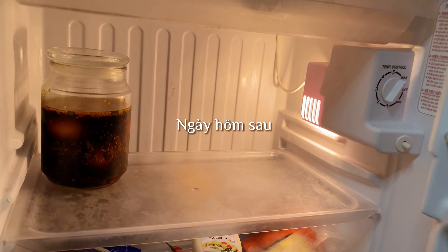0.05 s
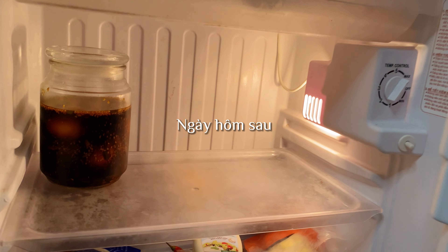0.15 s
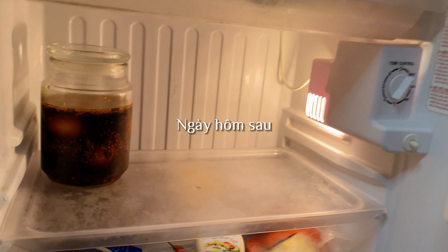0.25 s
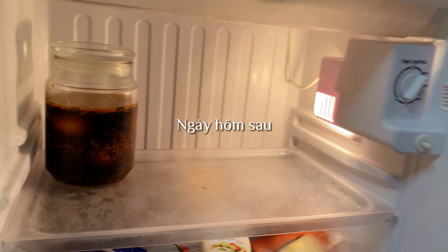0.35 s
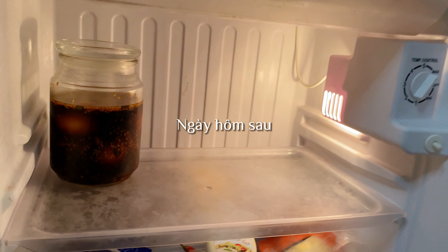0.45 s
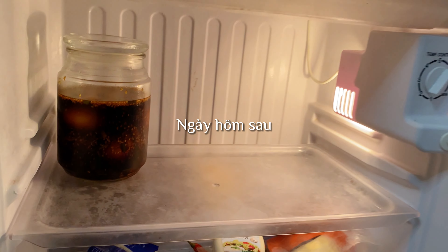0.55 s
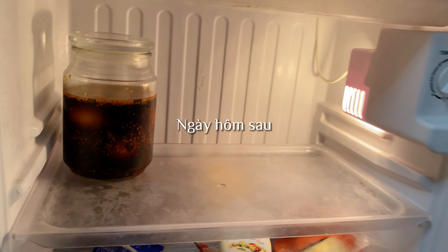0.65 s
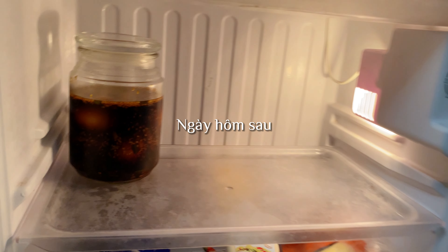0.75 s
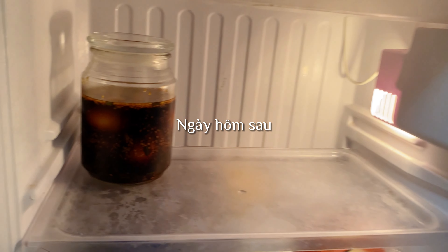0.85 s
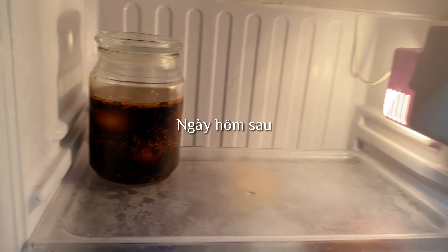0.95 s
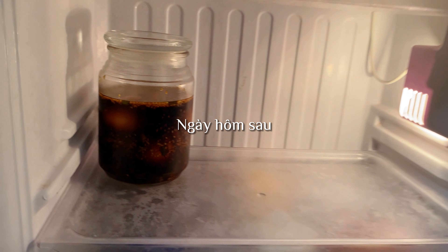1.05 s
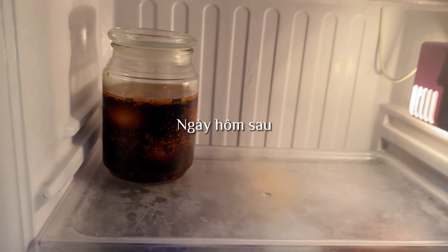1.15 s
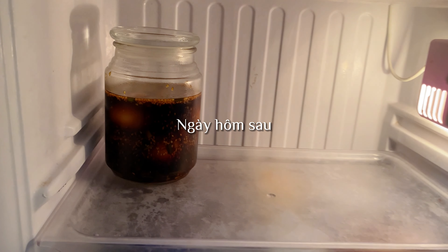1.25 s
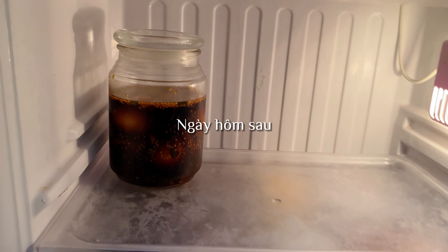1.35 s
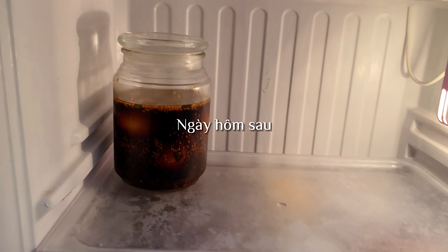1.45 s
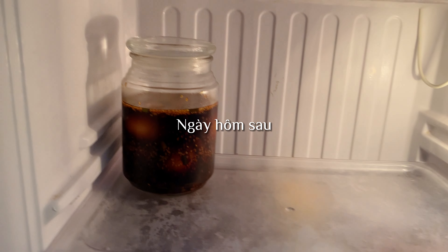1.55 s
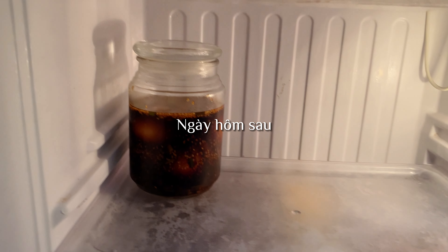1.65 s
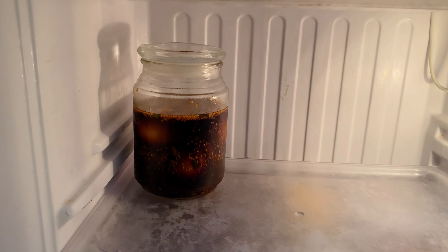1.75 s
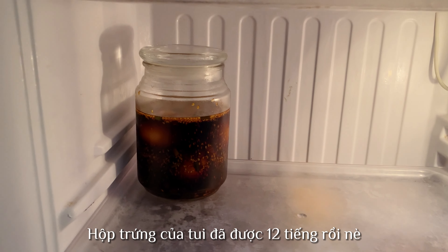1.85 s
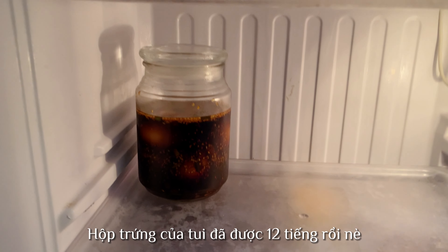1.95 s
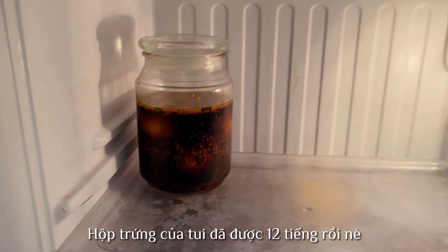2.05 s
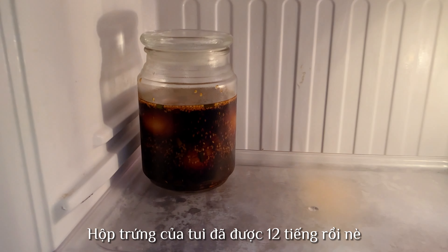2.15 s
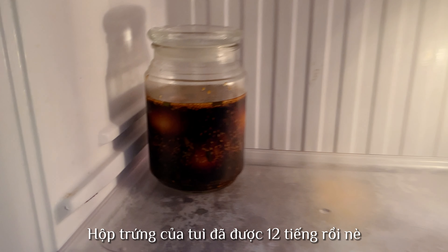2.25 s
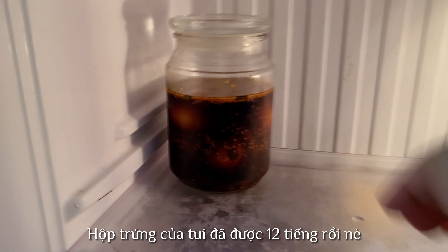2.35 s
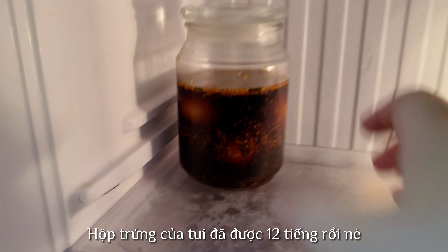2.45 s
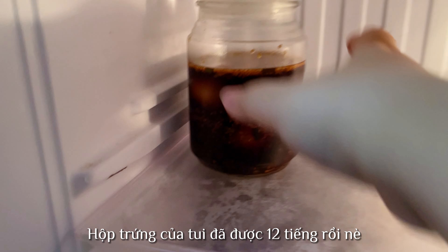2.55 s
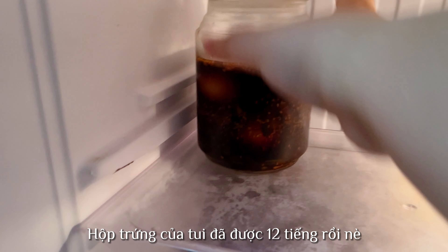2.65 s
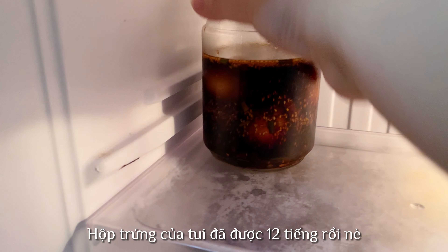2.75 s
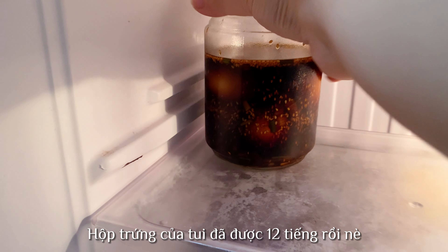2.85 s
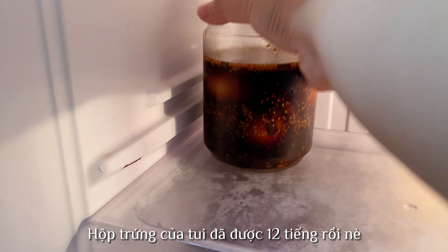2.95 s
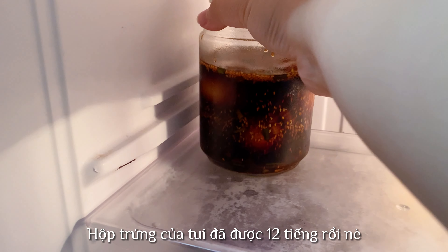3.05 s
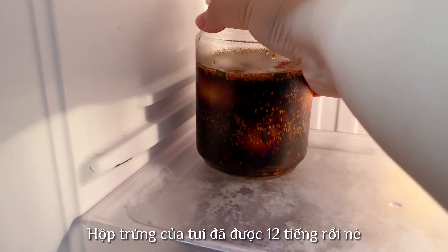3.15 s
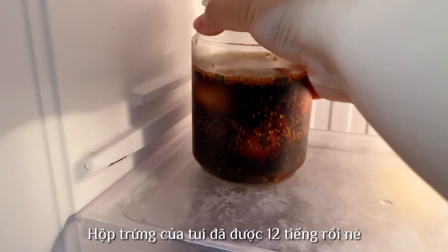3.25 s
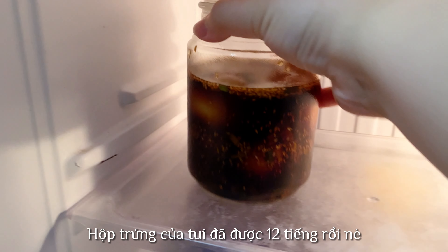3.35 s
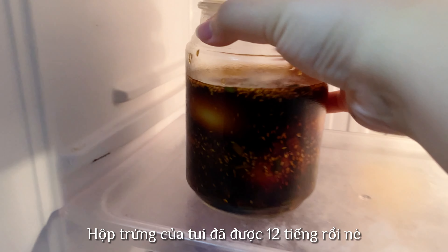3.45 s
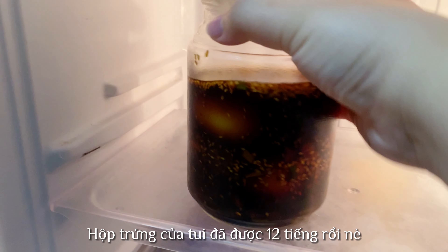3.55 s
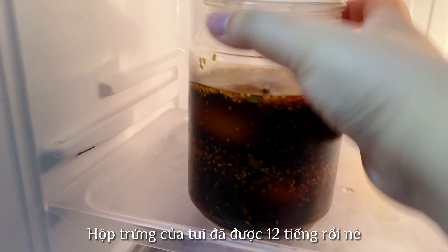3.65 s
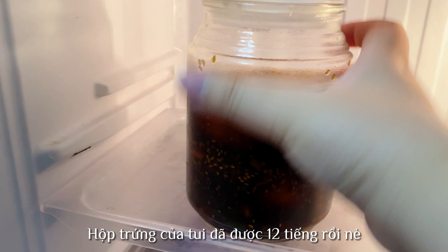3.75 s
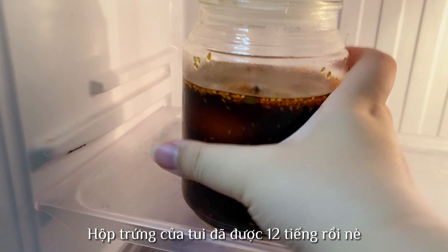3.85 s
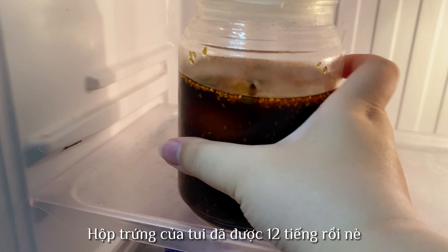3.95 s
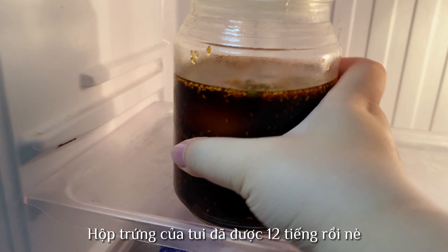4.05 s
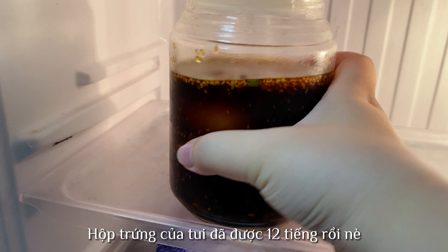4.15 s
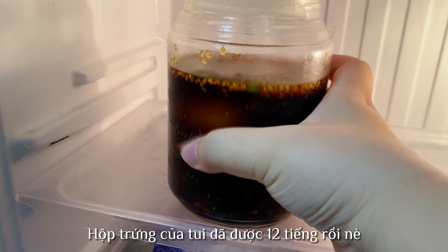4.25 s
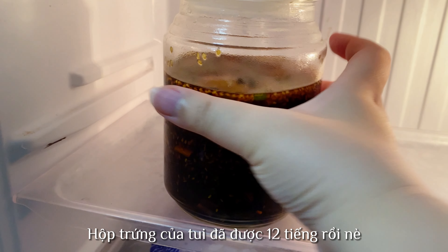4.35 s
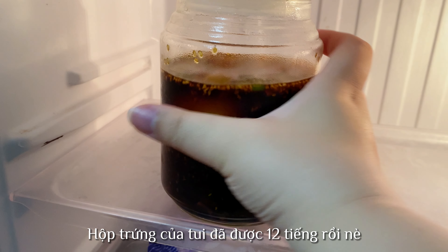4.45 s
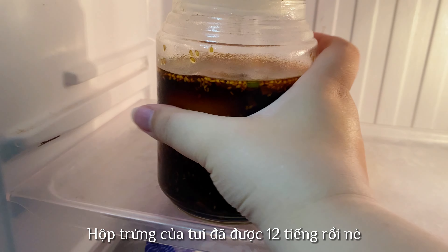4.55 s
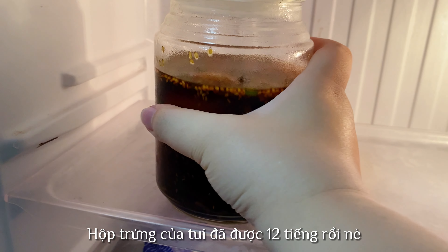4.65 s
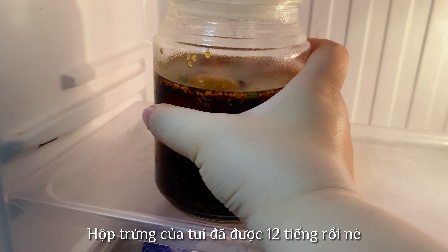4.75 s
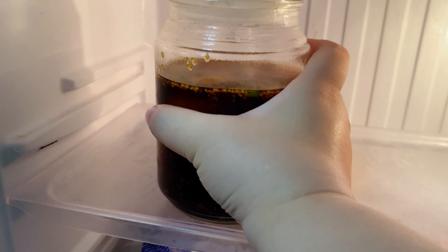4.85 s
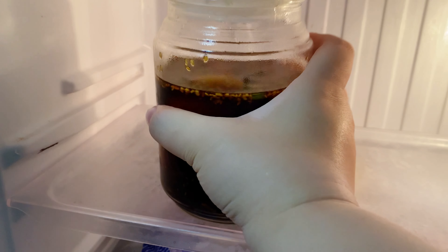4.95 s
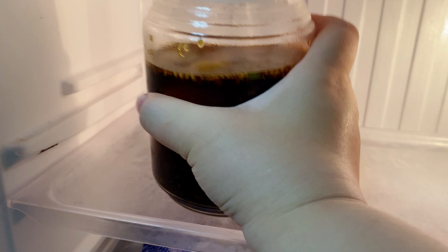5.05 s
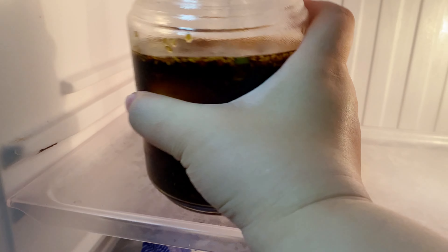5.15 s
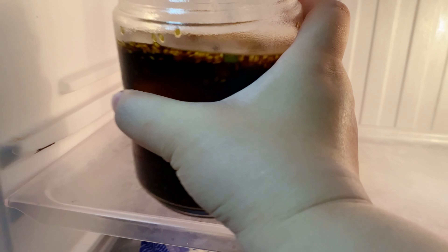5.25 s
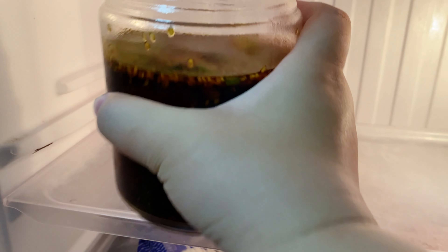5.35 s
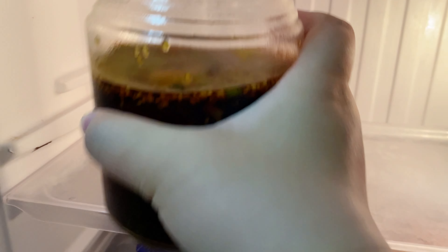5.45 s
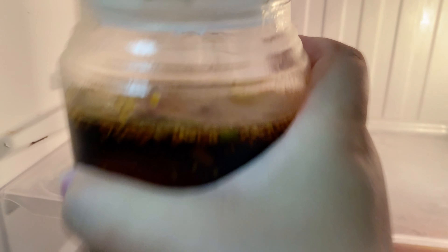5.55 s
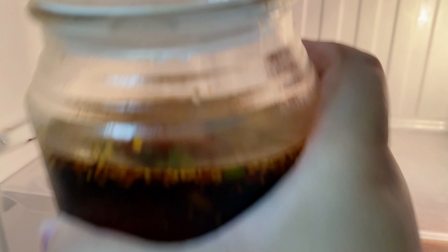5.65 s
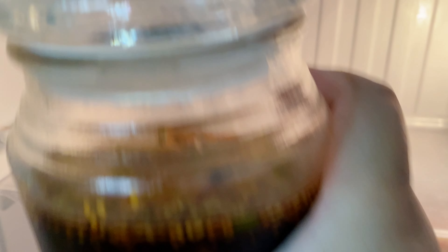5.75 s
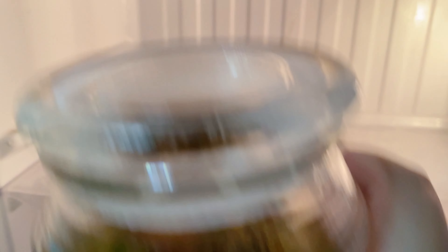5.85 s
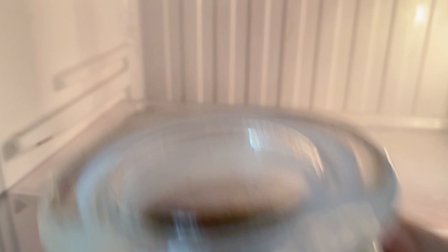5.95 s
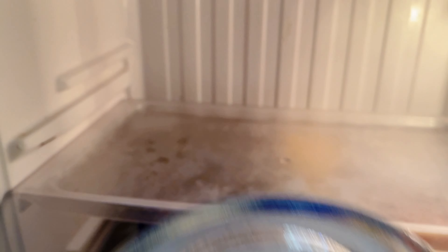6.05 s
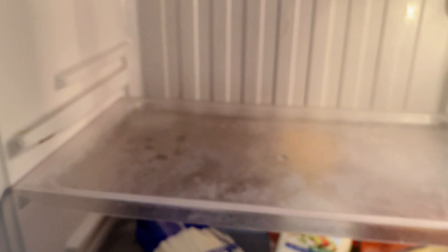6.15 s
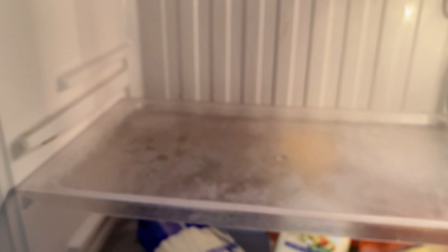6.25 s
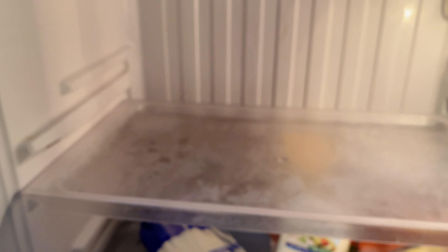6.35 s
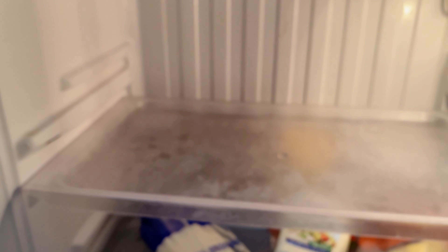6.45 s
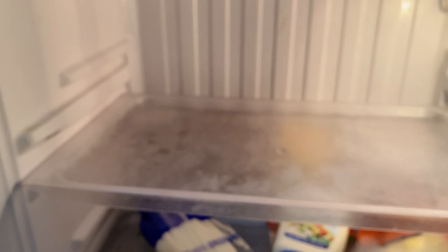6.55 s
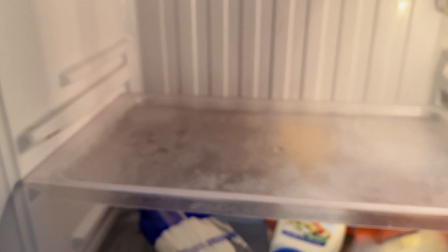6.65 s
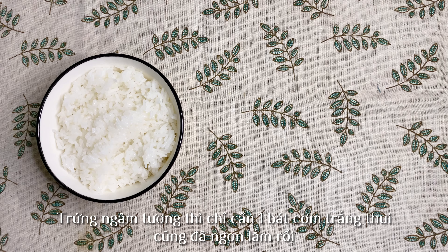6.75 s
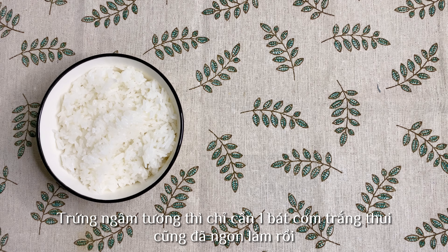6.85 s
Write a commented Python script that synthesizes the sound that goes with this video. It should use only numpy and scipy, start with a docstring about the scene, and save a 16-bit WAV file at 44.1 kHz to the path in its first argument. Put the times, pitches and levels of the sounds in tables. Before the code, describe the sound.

An open refrigerator hums while a heavy glass jar is dragged along its shelf in starts, with two clinking, hollow knocks.

```python
"""A full glass jar is dragged in starts over a gritty refrigerator shelf, heard from a phone peering in.
Grit rasps under the rim and shakes the shelf. The jar bumps twice: the glass pings and the shelf booms.
Behind it the compressor hums, cold air and the kitchen murmur in the cabinet, a sleeve brushes by
and fingers shift on the phone. Near the end the sound drops out and returns in a quieter place."""
import sys
import numpy as np
from scipy import signal
from scipy.fft import rfft, irfft, next_fast_len
from scipy.io import wavfile
from scipy.ndimage import uniform_filter1d, map_coordinates

SR = 44100
rng = np.random.default_rng(int(sys.argv[2]) if len(sys.argv) > 2 else 0)


def transcribe(signal):
    """Save signal, clipped to [-1, 1], as a 16-bit WAV file at the path in sys.argv[1]."""
    frames = np.atleast_2d(signal).T
    limited = np.clip(frames, -1, 1)
    pcm = np.round(limited * 32767).astype(np.int16)
    wavfile.write(sys.argv[1], SR, pcm)


N = 303849
T = np.arange(N) / SR
FFT_SIZE = next_fast_len(N)
FREQS = np.fft.rfftfreq(FFT_SIZE, 1 / SR)

# how enclosed the background sounds: t/s, enclosure (0 open, 1 deep in the cabinet)
# at 6.72 s it cuts to a quieter place
ENCLOSURE = [(0, 0.063), (1.5, 0.35), (2.3, 0.42), (2.8, 0.53), (5.0, 0.97), (6.7, 0.96), (6.74, 0.089),
             (6.89, 0.13)]
# tone colour of the murmuring air: f/Hz, relative level/dB
AIR_COLOUR = [(18, -32.5), (30, -11.5), (53, -4), (71, -6), (102, -2.5), (156, -14), (177, -15.5),
              (307, -17), (432, -25.5), (546, -31.5), (622, -33), (945, -34), (2690, -43), (8950, -58),
              (15500, -85)]
# how alike the air sounds left and right: f/Hz, likeness (0 to 1)
AIR_LIKENESS = [(40, 0.166), (130, 0.2), (300, 1), (700, 0.11), (2000, 0.035), (15000, 0.75)]
# pitches the cabinet's air favours: f/Hz, width/Hz, boost/dB
AIR_RESONANCES = [(141, 15, 3), (230, 30, 2), (271, 4.7, -6.5), (329.7, 9.5, 7.5), (351.3, 7.5, 5.5),
                  (397, 24, 5), (484, 14, 7), (1052, 180, 5), (3170, 300, 4)]
# hum at 1, 2 and 3 times the shaft rate: open level/dB, gain when enclosed/dB, flutter/dB, left lag/rad
HUM_TONES = [(-48, 4.5, 1.4, 1.4), (-59.5, 7.5, 4, 0.82), (-63, 5.5, 4.5, .2)]
# thin compressor tones: f/Hz, level/dB, share of the changing whine boost, flutter/dB
WHINE_TONES = [(539, -67.5, 0.98, 0.6), (935, -79, 0.13, 2.5), (1437, -78.5, 0.2, 4.5),
               (5103, -91, .8, 3.5)]
# fingers shifting on the phone: t/s, level/dB, f/Hz, left minus right/dB
FINGER_BUMPS = [(0.194, -40.5, 433, 2), (0.404, -33, 221, 1), (0.617, -33, 340, 2), (1.092, -33.5, 400, -5),
                (1.364, -33.5, 387, 8), (1.47, -44, 300, -2), (6.623, -40, 480, 2.5)]
# level difference between the two microphones: f/Hz, left minus right/dB
MIC_BALANCE = [(60, 0.5), (110, -8.5), (200, -2), (380, -3.5), (700, -15), (1290, -2.5), (2380, -4),
               (4400, -11.5), (8120, -3), (15000, 1)]
# phase difference between them: f/Hz, left lead/rad
MIC_PHASE = [(60, -.3), (140, -.6), (330, -.75), (520, -1.4), (950, -5.7), (1290, -5.4), (1890, -4.4),
             (3190, -7.6), (4130, -7.1), (5170, -7.3), (5770, -8.7), (7670, -8.5), (11700, -6.3)]
# echo of the cabinet: f/Hz, time to fade by 60 dB/s
ECHO_FADE = [(200, 0.5), (1000, 0.26), (4000, 0.11), (12000, 0.046)]
# ringing tones (modes) of the shelf and liner: f/Hz, level/dB, time to fade by 60 dB/s
SHELF_MODES = [(139.14, 0.5, 1.43), (174.4, -1.5, 0.51), (225.4, -6.5, 0.27), (262.7, -7.5, 0.33),
               (306.3, -3.5, 0.2), (334.6, -5.5, 0.11), (399, -10, 0.16), (439, -7, 0.12),
               (474, -6.5, 0.17), (547.8, -10, 0.34), (672.6, -6, 0.12), (760, -12, 0.2), (868.6, -6, 0.12),
               (1140, -10.5, 0.16), (1180, -7, 0.067)]
# weight landing on the shelf: t/s, strength/dB, contact time/ms, favoured f/Hz
SHELF_THUDS = [(2.84, -45.5, 0.93, 527), (3.027, -40.5, 0.52, 500), (3.14, -32, 0.26, 487),
               (3.31, -36.5, 1.1, 329), (3.4, -32, 3.1, 320), (3.43, -36, 5, 145), (3.495, -30, 2.2, 328),
               (3.447, -32, 0.39, 683), (3.533, -25, 0.83, 800), (3.535, -23.5, 1.4, 327.4),
               (3.55, -14.5, 5.33, 159.4), (3.734, -35.5, 2.5, 152), (5.558, -26, 0.8, 468),
               (5.565, -26, 0.23, 775), (5.573, -15, 0.97, 294), (5.59, -18, 1.34, 402),
               (5.62, -27, 6.6, 132), (5.638, -19, 1.5, 269), (5.662, -21, 1.16, 229)]
# ringing tones of the jar wall: f/Hz, level/dB, time to fade by 60 dB/s
GLASS_MODES = [(1015, 0, 0.033), (1240, 2, 0.049), (2110, 4, 0.037), (2545, -1.5, .04), (2735, -3, .045),
               (3005, 0, 0.022), (4610, -2.5, .03), (5800, 0, .04)]
# taps on the glass: t/s, strength/dB, favoured f/Hz
GLASS_TAPS = [(0.3507, -40, 3050), (.651, -59, 2000), (3.53, -22, 3044), (3.536, -26, 1025),
              (3.964, -49, 1015), (4.163, -49, 2370), (5.557, -25, 1280), (5.558, -22.5, 2700),
              (5.583, -27.5, 2440), (5.608, -31, 2730), (5.625, -34, 2710)]
# tone colour of the grit: f/Hz, relative level/dB
GRIT_COLOUR = [(120, -47.5), (200, -19.5), (334, 5.5), (577, -2.5), (693, -3.5), (1310, 2), (3100, -9),
               (6220, -9.5), (11000, -16), (15800, -23.5)]
# pitches the jar favours: f/Hz, width/Hz, boost/dB
JAR_RESONANCES = [(325.7, 30, 8), (491, 69, 4), (681.5, 25, 12.5), (868, 66, 9), (1162, 270, -1),
                  (3025, 300, 4.5), (3540, 160, 5.5), (5773, 280, 9), (11600, 1700, 3)]
# short cracks: t/s, strength at 1.9-7 kHz/dB, then added to it: body/dB, fizz/dB, topmost fizz/dB
CRACKS = [(0.3492, -45, 4.5, -7, 4), (0.403, -60, 7, 7, -10), (0.648, -54, -3, 1, -15),
          (0.655, -55.5, 5, 2, -15), (0.9376, -59, 8, 10.5, 1), (1.088, -54.5, 21, -41, -37),
          (1.094, -61, 18, -34, -37), (1.294, -46.5, -1.5, -14, -24), (1.308, -45.5, 1, -4, -21),
          (1.709, -52, -19, -8, -27), (1.734, -51.5, 3, -2, -10), (2.214, -45.5, -0.5, -3, -23),
          (2.246, -67, -11, 3, 4), (2.839, -62, 6, -16, -20), (3.1017, -46.5, 7, -5, -15),
          (3.274, -35.5, 7, -17, -17), (3.3975, -28, -3, -18.5, -4), (3.4042, -36.5, -1, -28.5, 17.5),
          (3.53, -24.5, 7, 10.5, 5), (3.8255, -46, 5.5, -33, -49), (3.9332, -50.5, 1, -7, -24.5),
          (3.9629, -48, 13.5, -23, -8), (4.154, -34.5, -4.5, 0.5, 0), (4.5303, -59.5, 0, 3, -1),
          (4.569, -51, -9, -3, -13), (4.5993, -56.5, -8, 9, 13), (4.793, -53, -4.5, 1, 2),
          (5.339, -62.5, 9, -3.5, -8.5), (5.5561, -21.5, 2.5, -15, -19), (5.566, -22, 1.5, -11.5, -30),
          (5.582, -34.5, -1, -6, -10), (5.603, -32.5, 8, -6, -25), (5.622, -37, 12, -20, -25)]
# hand and sleeve brushing: start/s, peak/s, end/s, grit level/dB, then added to it: rasp/dB, fizz/dB
SLEEVE_STROKES = [(1.3, 1.38, 1.59, -68.5, -22, -1), (1.64, 1.734, 1.86, -72, -12, -7),
                  (2.21, 2.24, 2.5, -76.5, -2, -9), (6.04, 6.272, 6.5, -75.5, -14.5, 1)]
# short slips of the jar: start/s, peak/s, end/s, grit level/dB, then added to it: rasp/dB, fizz/dB
JAR_SLIPS = [(2.8, 2.86, 3.1, -90, 23.5, -1), (2.9, 2.932, 2.97, -82.5, 16, 10),
             (3.984, 3.996, 4.28, -59, -7, 1), (3.99, 4.045, 4.07, -56, -7, -1.5),
             (4.07, 4.155, 4.17, -54.5, 3, -2), (4.15, 4.228, 4.24, -56, -1.5, 3.5),
             (4.2, 4.3, 4.47, -77, -3, 5), (4.42, 4.485, 4.53, -81, -3, 7), (4.51, 4.58, 4.74, -68, -1, 3),
             (4.59, 4.65, 4.76, -74, 2, -0.5), (4.77, 4.805, 4.88, -67.5, 5.5, 0.5),
             (5.553, 5.59, 5.687, -43, 7.5, -14.5)]
# the long drag, broken by the first bump: t/s, grit level/dB
LONG_DRAG = [(3.0, -86), (3.014, -62), (3.06, -58), (3.13, -53.5), (3.155, -51), (3.225, -52.5),
             (3.275, -46.5), (3.352, -40.5), (3.524, -42), (3.546, -56.5), (3.574, -44), (3.666, -49.5),
             (3.715, -64.5), (3.78, -100)]

REACH_S, REST_S = 2.5, 3.765  # the hand enters the cabinet; the long drag comes to rest
DROP_S, RETURN_S = 6.72, 6.729  # the sound drops out and comes back in a quieter place


def undb(db):
    """Turn decibels into a plain gain."""
    return 10 ** (np.asarray(db) / 20)


def unit(x):
    """Scale a signal to an average (RMS) level of 1."""
    return x / np.sqrt(np.mean(x ** 2))


def fade(t, t60):
    """A gain that falls by 60 dB every t60."""
    return 10 ** (-3 * t / t60)


def over_hz(table, hz):
    """Read a table along a logarithmic frequency axis."""
    freqs, values = np.transpose(table)
    return np.interp(np.log(hz + 1), np.log(freqs + 1), values)


def band(x, lo_hz, hi_hz):
    """Keep what lies between two frequencies."""
    return signal.sosfilt(signal.butter(2, [lo_hz, hi_hz], "bandpass", fs=SR, output="sos"), x)


def wobble(per_s):
    """A smooth random curve, roughly 1 in size, with per_s new values a second."""
    hold = int(SR / per_s)
    steps = np.repeat(rng.standard_normal(N // hold + 1), hold)
    return 1.3 * uniform_filter1d(uniform_filter1d(steps, hold), hold)[:N]


def random_clicks(per_s):
    """Clicks of random size at random moments."""
    return (rng.random(N) < per_s / SR) * rng.standard_normal(N)


def resonance_db(resonances):
    """The boost in dB that resonances give each frequency."""
    return sum(db / (1 + (2 * (FREQS - hz) / width) ** 2) for hz, width, db in resonances)


def favour(modes, spot_hz, db_per_octave):
    """Tones near the pitch of the struck spot ring most."""
    return [(hz, db - db_per_octave * abs(np.log2(hz / spot_hz)), t60) for hz, db, t60 in modes]


def ring(force, modes):
    """A force sets fading tones ringing; small panels give off no deep bass."""
    t = T[:SR]
    tones = sum((-1) ** k * undb(db) * np.sin(2 * np.pi * hz * t) * fade(t, t60)
                for k, (hz, db, t60) in enumerate(modes))
    return band(signal.fftconvolve(force, tones)[:N], 120.1, 8880)


def strike(start_s, force, modes):
    """One blow and its ringing, placed at start_s."""
    out, at = np.zeros(N), int(start_s * SR)
    ringing = ring(np.pad(force, (0, SR // 2)), modes)[:N - at]
    out[at:at + len(ringing)] = ringing
    return out


def enclosure():
    """How enclosed the background sounds at each moment."""
    return np.interp(T, *np.transpose(ENCLOSURE))


def air_murmur():
    """Cold air and kitchen noise resonate in the cabinet; each half octave flickers on its own."""
    noise = rfft(rng.standard_normal((2, FFT_SIZE)))
    likeness = over_hz(AIR_LIKENESS, FREQS)
    shared, apart = noise[0] * np.sqrt(1 + likeness), noise[1] * np.sqrt(1 - likeness)
    left = (shared + apart) * undb(-2) * np.exp(-2j * np.pi * FREQS * 20 / SR)  # 20 samples late
    colour = undb(over_hz(AIR_COLOUR, FREQS) + resonance_db(AIR_RESONANCES))
    pair = colour * np.array([left, shared - apart])
    pair /= np.std(band(irfft(pair.mean(0), FFT_SIZE), 200, 500))  # level 1 at 200-500 Hz
    out, octave = 0, np.log2(FREQS + 1)
    treble_db = -1.5 - 2 * enclosure()  # duller when enclosed
    for centre in np.arange(4.5, 14.5, .5):
        share = np.clip(1 - 2 * abs(octave - centre), 0, 1)
        tilt_db = treble_db * np.clip((centre - 8.5) / 2, 0, 1)
        out += undb(tilt_db + 1.1 * wobble(9)) * irfft(pair * share, FFT_SIZE)[:, :N]
    return out * undb(-54 + 0.15 * enclosure() + 0.5 * (T > RETURN_S))


def crackle():
    """Dense tiny clicks high in the treble, fainter when the background is enclosed."""
    clicks = random_clicks(3000) * undb(1.5 * rng.exponential(size=N))
    fizz = band(band(clicks, 8450, 15000), 8450, 15000)
    return unit(fizz) * undb(-93.5 - 8.5 * enclosure())


def compressor(shaft_hz=50.02):
    """The turning shaft hums with two overtones, and faint whines waver above it."""
    angle = 2 * np.pi * np.cumsum(shaft_hz + 0.16 * wobble(3.166)) / SR
    # the third tone swells while the hand leans on the shelf
    lean_db = np.interp(T, [2.4, 3.202, 4.5, 5.1], [0, 9.5, 9.5, 0])
    out = np.zeros((2, N))
    for k, (db, enclosed_db, flutter_db, lag) in enumerate(HUM_TONES, 1):
        gain = undb(db + enclosed_db * enclosure() + lean_db * (k == 3) + flutter_db * wobble(8.3))
        out += gain * np.sin([k * angle - lag / 2, k * angle + lag / 2])
    whine_boost_db = 3.5 - 11 * enclosure() + 9 * (T > RETURN_S)
    for hz, db, share, flutter_db in WHINE_TONES:
        phase = 2 * np.pi * (hz * T + np.cumsum(1.5 * wobble(5.3)) / SR)
        gain = undb(db + share * whine_boost_db + flutter_db * wobble(30))
        out += gain * np.array([np.cos(phase), np.sin(phase)])
    return np.sqrt(2) * out


def valve(ticks_per_s=49.3):
    """A thin, uneven tick about once a compressor turn, heard only at first, near the door."""
    count = np.floor(ticks_per_s * (T - .018)).astype(int) + 1
    strengths = undb(2 * rng.standard_normal(N // 500))
    clicks = np.diff(count, prepend=count[0]) * strengths[count]
    ticks = band(band(clicks, 10200, 12600), 10200, 12600)
    return unit(ticks) * undb(-97) * np.interp(T, [.85, 1.1], [1, 0])


def finger_bumps():
    """Dull, dry bumps travel through the phone's case, a few cycles each."""
    out = np.zeros((2, N))
    for start_s, db, hz, pan_db in FINGER_BUMPS:
        cycles = np.maximum(T - start_s, 0) * hz
        bump = np.sin(2 * np.pi * cycles) * np.minimum(cycles / 0.92, 1) * fade(cycles, 9.8)
        out += undb([[db + pan_db / 2], [db - pan_db / 2]]) * bump
    return out


def cabinet(x, echo_db):
    """The hard box echoes a sound, and each microphone hears it with its own colour and lag."""
    t, echo = T[:SR // 2], 0
    for hz in 177 * 2. ** np.arange(7):
        noise = band(rng.standard_normal((2, len(t))), hz / np.sqrt(2), hz * np.sqrt(2))
        echo += noise * fade(t, over_hz(ECHO_FADE, hz)) * min(hz / 600, 1) ** 2
    echo *= np.minimum(t / 0.0022, 1)
    echo /= np.sqrt(np.sum(echo ** 2, 1, keepdims=True))
    box = 1 + undb(echo_db) * rfft(echo, FFT_SIZE)
    left = undb(over_hz(MIC_BALANCE, FREQS) / 2) * np.exp(.5j * over_hz(MIC_PHASE, FREQS))
    return irfft(rfft(x, FFT_SIZE) * box * np.array([left, 1 / left]), FFT_SIZE)[:, :N]


def cabinet_boom(start_s=5.6, hz=66):
    """The whole cabinet shudders after the last bump: one deep, fading tone."""
    t = np.maximum(T - start_s, 0)
    return undb(-30.5) * np.minimum(t / 0.015, 1) * fade(t, 0.7) * np.sin(2 * np.pi * hz * t)


def shelf_thuds(glide_from_s=3.56, rise_per_s=0.41):
    """Weight pushes into the shelf; a longer contact rings only its lowest tones."""
    out = np.zeros(N)
    for start_s, db, contact_ms, hz in SHELF_THUDS:
        progress = T[:SR // 50] * 1000 / contact_ms
        push = np.where(progress < 1, np.sin(np.pi * progress) ** 2, 0)
        out += strike(start_s, undb(db) * push / push.sum(), favour(SHELF_MODES, hz, db_per_octave=14.5))
    # the ring rises in pitch as the jar slides off the middle, then the resting jar's weight stills it
    sliding_s = np.clip(T - glide_from_s, 0, REST_S - glide_from_s)
    ahead_s = rise_per_s * sliding_s ** 2 / 2
    gliding = map_coordinates(out, [(T + ahead_s) * SR], order=1, mode="nearest")
    stilled = np.clip(1 - (T - REST_S) / 0.01, .09, 1)
    return np.where(T < REST_S + 1, gliding * stilled, out)  # the second bump rings freely


def glass_pings():
    """Fingernail and rim taps ring the jar wall."""
    return sum(strike(start_s, undb([db]), favour(GLASS_MODES, hz, db_per_octave=55.5))
               for start_s, db, hz in GLASS_TAPS)


def through_jar(x, gains, edges_hz, resonance, wander=0):
    """Grit and jar colour a sound; its pitch may wander, and each band follows its own gain."""
    colour = undb(over_hz(GRIT_COLOUR, FREQS) + resonance * resonance_db(JAR_RESONANCES))
    coloured = irfft(rfft(x, FFT_SIZE) * colour, FFT_SIZE)[:N]
    drift = wobble(12)
    read_at = np.arange(N) + wander * np.cumsum(drift - drift.mean())
    spectrum = rfft(map_coordinates(coloured, [read_at], mode="mirror"), FFT_SIZE)
    lowpasses = [0] + [1 / (1 + (FREQS / hz) ** 8) for hz in edges_hz] + [1]
    return sum(gain * unit(irfft(spectrum * (upper - lower), FFT_SIZE)[:N])
               for gain, lower, upper in zip(gains, lowpasses, lowpasses[1:]))


def cracks(chatter_s=0.0043, t60_s=0.037):
    """Short cracks: a few milliseconds of chatter that fades, the treble first."""
    gains = np.zeros((4, N))
    for start_s, db, body_db, fizz_db, top_db in CRACKS:
        at = int(np.ceil(start_s * SR))
        t = T[at:at + SR // 2] - start_s
        stretch = undb(0.22 * (db + 30.5))  # harder cracks last longer
        band_t60s = stretch * t60_s * np.array([[1.3], [1], [.65], [.55]])
        shape = np.minimum(t / 0.00081, 1) * fade(np.maximum(t - stretch * chatter_s, 0), band_t60s)
        gains[:, at:at + len(t)] += undb(db + np.array([[body_db], [0], [fizz_db], [top_db]])) * shape
    return undb(-9) * through_jar(rng.standard_normal(N), gains, [1900, 7000, 11500], resonance=0.65)


def stroke_gains(strokes, edge_db=25):
    """Gains of low rasp, middle grit and high fizz: each stroke swells by edge_db, then ebbs."""
    gains = np.zeros((3, N))
    for start, peak, end, db, rasp_db, fizz_db in strokes:
        away = np.interp(T, [start, peak, end], [1, 0, 1])
        grit_db = db - edge_db * away ** 1.83  # the power rounds the top
        gains += (away < 1) * undb([grit_db + rasp_db, grit_db, grit_db + fizz_db])
    return gains


def friction(gains, shake_db):
    """Thousands of grains a second slip unevenly; they and a few harder catches shake the shelf."""
    rasp_gain, grit_gain, _ = gains
    grains = unit(random_clicks(9000) * undb(1.14 * rng.exponential(size=N)))
    grains *= undb(1.6 * wobble(70) + .7 * wobble(20))
    shake = ring(grains * grit_gain * undb(shake_db), SHELF_MODES)
    catches = random_clicks(53) * undb(shake_db + 25)
    shake += ring(catches * rasp_gain, favour(SHELF_MODES, 647.3, db_per_octave=5.5))
    return through_jar(grains, gains, [1900, 7000], resonance=1.06, wander=.018) + shake


def sleeve_brushes():
    """Hand and sleeve rub softly in a few strokes."""
    return friction(stroke_gains(SLEEVE_STROKES), shake_db=-42)


def jar_drag():
    """The jar's rim grinds over the grit in one long drag and several short slips."""
    grit_db = np.interp(T, *np.transpose(LONG_DRAG), left=-200, right=-200)
    rasp_db = -1.5 - 0.37 * (grit_db + 50.5)  # the lighter the grit, the more the rasp stands out
    gains = undb([grit_db + rasp_db, grit_db, grit_db + 0.6])
    return friction(gains + stroke_gains(JAR_SLIPS), shake_db=-38.5)


def scene():
    """Mix the sources, with more echo once the hand is inside and a brief dropout near the end."""
    near = jar_drag() + sleeve_brushes() + cracks() + glass_pings() + shelf_thuds() + crackle() + valve()
    outside = T < REACH_S
    mix = cabinet(near * outside, echo_db=-10) + cabinet(near * ~outside, echo_db=-7)
    mix += compressor() + air_murmur() + cabinet_boom() + finger_bumps()
    drop_out = np.clip((DROP_S - T) / .003, 0, 1)
    come_back = undb(-4.5) * np.clip((T - RETURN_S) / 0.0073, .01, 1)
    return mix * np.maximum(drop_out, come_back)


def record(dry):
    """The phone trims the deepest bass and cuts the highest treble."""
    trimmed = signal.sosfilt(signal.butter(6, 40, "highpass", fs=SR, output="sos"), dry)
    return signal.sosfilt(signal.ellip(10, .2, 80, 15900, fs=SR, output="sos"), trimmed)


dry = scene()
out = record(dry)
transcribe(out)
```